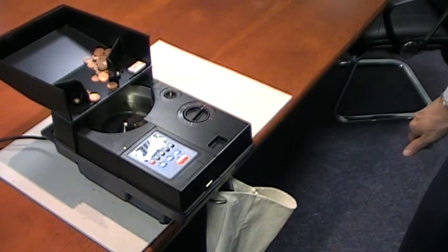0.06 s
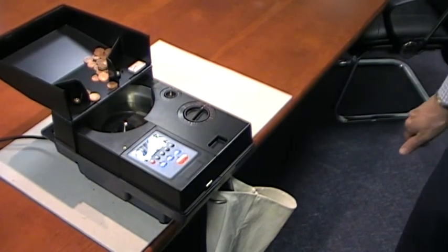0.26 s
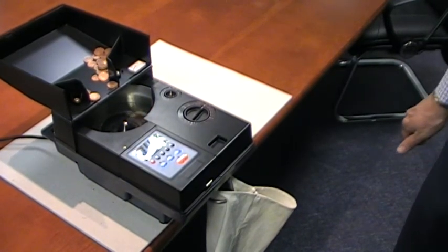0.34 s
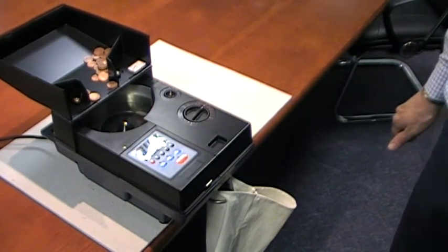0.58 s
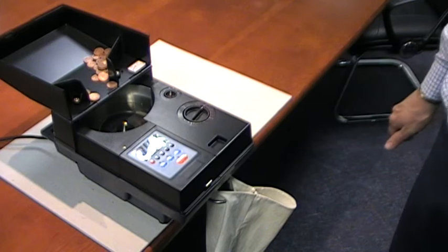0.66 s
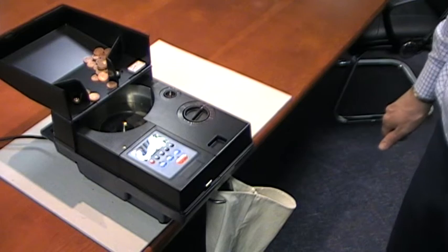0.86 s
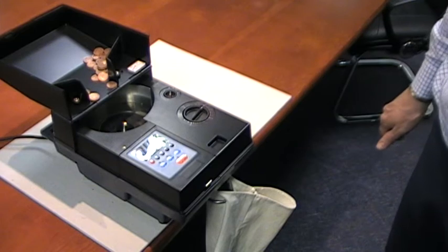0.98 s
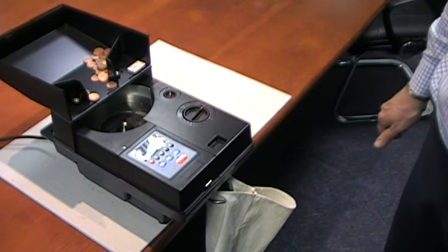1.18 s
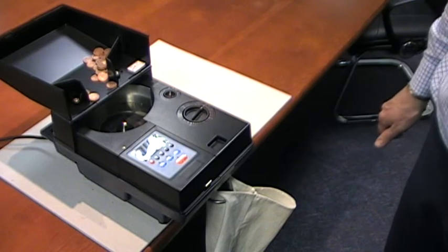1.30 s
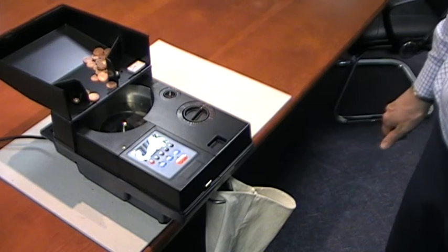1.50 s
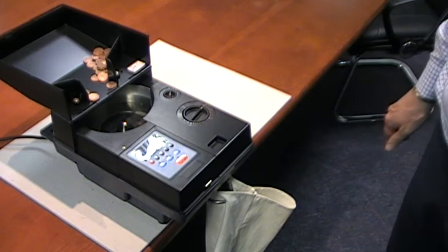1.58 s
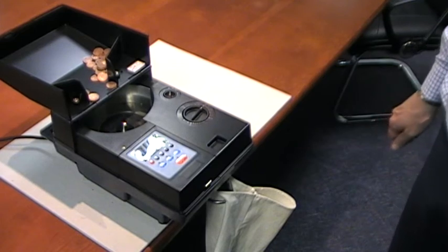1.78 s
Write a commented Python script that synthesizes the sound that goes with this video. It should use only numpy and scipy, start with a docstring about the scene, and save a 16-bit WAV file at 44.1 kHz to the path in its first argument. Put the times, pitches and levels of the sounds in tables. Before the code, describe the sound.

A tabletop coin counter starts with a scraping metallic jolt and squeak, rumbles briefly while three coins clack sharply, brakes with a ring and ticks once later; close stereo microphone in a quiet, faintly humming office.

```python
"""First a quiet office is heard: air noise, a faint hum and faint whines. Then a small coin counting machine on
a table runs one short burst. Its motor starts with a jolt, rumbles in the plastic housing and drags a steel
disc round; the struck steel chirps and the disc's edge squeaks. Three coins clack through the gate, the brake
rings the steel and a relay ticks late. Shaped noise makes the rush, rumble and scrape; fading sines make the
steel, coins and table."""
import sys
import numpy as np
from scipy import signal
from scipy.fft import rfft, irfft, next_fast_len
from scipy.io import wavfile
from scipy.ndimage import map_coordinates

SR = 44100
rng = np.random.default_rng(int(sys.argv[2]) if len(sys.argv) > 2 else 0)


def wav_record(signal):
    """Record a signal, one row per channel, as 16-bit PCM in the file named by sys.argv[1]."""
    frames = np.transpose(np.atleast_2d(signal))
    bounded = np.clip(frames, -1, 1)
    # unit amplitude maps onto the largest positive 16-bit level
    quanta = np.round(bounded * 32767).astype(np.int16)
    wavfile.write(sys.argv[1], SR, quanta)


def voltage_ratio(decibels):
    """Convert decibels (scalar or array-like) to amplitude ratios, 20 dB per decade."""
    exponent = np.asarray(decibels, float) / 20
    return 10 ** exponent


N = 81585  # length in samples

# A t60 is the time a sound takes to fade by 60 dB. Levels called relative are shifted or scaled later on.

# colour of the air noise: (frequency [Hz], relative level [dB])
AIR_COLOUR = [(15, -36.5), (25, -7), (65, -8), (191, -5), (231, -10), (347, -14), (467, -17), (535, -18),
              (702, -10.5), (872, -19), (1110, -11.5), (1210, -20), (4300, -30), (6050, -33.5),
              (8150, -34.5), (11500, -44), (15800, -50)]
AIR_DB, AIR_RISE_DB_PER_S = -60, 2
# how alike air and far rush are at left and right: (frequency [Hz], likeness [-1 to 1])
AIR_LIKENESS = [(60, -0.28), (240, -0.36), (950, -0.13), (3770, -0.2), (15000, -0.04)]
# swell of a far rush: (time [s], level [dB])
FAR_RUSH_SWELL = [(0, -68), (1.2, -60.5), (1.6, -55.5), (1.85, -52)]
# colour of the far rush: (frequency [Hz], relative level [dB])
FAR_RUSH_COLOUR = [(25, -18), (55, 4.5), (200, 0.5), (340, 0), (1100, -16.5), (6000, -30.5), (11000, -58.5)]
# hum lines: (frequency [Hz], level [dB], pitch waver [Hz])
HUM_LINES = [(58, -75, 4.3), (118.9, -67.5, 5.7), (460, -74, 10), (1084, -68, 3)]
# faint whines heard until just after the motor starts: (frequency [Hz], level [dB])
STANDBY_WHINES = [(3230, -81.5), (4560, -83)]

# how long the office rings: (frequency [Hz], t60 [s])
OFFICE_FADE = [(200, 1), (1000, 0.5), (4000, 0.13), (8000, 0.29), (14000, 0.067)]
# what the walls give back: (frequency [Hz], level [dB])
WALL_COLOUR = [(200, 0.5), (2000, 0.5), (7000, -4), (14000, -3)]
# width of the room sound: (frequency [Hz], side over mid [dB])
OFFICE_WIDTH = [(200, -6), (600, -16.5), (2500, -5), (6000, -3.5), (9000, -4), (14000, 3)]
OFFICE_DB = -10
# timing between the two microphone ports: (frequency [Hz], left ahead of right [rad])
LEFT_LEAD = [(60, 0), (260, .25), (1000, .2), (2000, -.1), (6000, .2), (7580, .3), (8440, 1.1), (9470, 1.3),
             (11400, .7), (13900, .6), (16000, -.3)]
# balance between the two ports: (frequency [Hz], left over right [dB])
LEFT_LEAN = [(60, -.5), (250, 2), (600, 2.4), (1400, 1), (2800, .7), (5600, -1.8), (10000, -.4),
             (15000, 1.2)]

# colour of the relay tick: (frequency [Hz], relative level [dB])
RELAY_COLOUR = [(410, -6.5), (700, 5.5), (1710, -12), (3990, -9), (4550, -14), (7290, -4.5), (9730, -4),
                (13700, -18.5), (16000, -40)]
RELAY_S, RELAY_DB, RELAY_RISE_S, RELAY_T60_S = 1.2285, -34, 0.00064, 0.029
RELAY_RATTLE_DB, RELAY_RATTLE_T60_S = -17, 0.3  # its loose cover buzzes on, level over the tick

# ringing tones of a coin: (frequency [Hz], relative level [dB], t60 [s])
COIN_MODES = [(2610, -12.5, 0.015), (3500, -9.5, .01), (4640, -3.5, 0.0096), (5400, -9, .008),
              (6530, 0.5, .035), (7100, 0, .03), (7800, -1, .025), (8780, 2, 0.025), (10350, -5, .015),
              (11260, -1, 0.0068), (12600, -14, .012), (14600, -24.5, .01)]
# coin contacts at the gate:
# (time [s], relative level [dB], brightness [dB per octave], time until gripped [s])
COIN_CLACKS = [(0.3924, -5.5, 3.5, .004), (0.393, -20, 1, .0032), (.3946, -14, -3, .002),
               (.5603, -15, -3, 0.0028), (.5608, -10, 10.5, .004), (0.562, -25.5, 2.5, .003),
               (0.565, -18, 2, .001), (.7018, -18, -0.5, .0047), (.7027, -13, 2.5, .0038),
               (0.7039, -19, 4.5, .0022)]
CONTACT_S, GRIP_S, GRIP_LEAVES_DB = 0.00025, 0.0006, -16.5
CLICK_DB, STEEL_ANSWER_DB = 8, -18  # both over the coin's own ring

# chirps of the struck steel (first two rows) and squeaks of the disc's rubbed edge (the rest): (centre time
# [s], level [dB], length [s], frequency [Hz])
CHIRPS_AND_SQUEAKS = [(0.2613, -13, 0.00787, 7700), (0.2665, -16.5, .008, 7060), (0.275, -22, .008, 7700),
                      (0.37, -26, 0.014, 7100), (0.425, -35, 0.018, 7100), (0.516, -26.5, 0.016, 7060),
                      (0.658, -33, 0.016, 7100), (0.691, -30, 0.016, 7100), (0.81, -35.5, 0.016, 7100)]
SQUEAK_WAVER_HZ = 40

# ringing tones of the steel disc and frame: (frequency [Hz], relative level [dB], t60 [s])
STEEL_MODES = [(1914, -22.5, 0.32), (2430, -20, 0.22), (2530, -18, .25), (3582, -11.5, 0.37),
               (4236, -19.5, .25), (4800, -17, .25), (5143, -8.5, 0.42), (6019, -11, 0.441),
               (6370, -15.5, 0.4), (6910, -11.5, .32), (7150, -1, 0.23), (7030, -3.5, 0.3),
               (7429, -12.5, .3), (7634, -5, 0.29), (7810, -6, 0.33), (8300, -9, .2), (9330, -7, 0.22),
               (9544, -5.5, 0.29), (11270, -15.5, 0.11), (11900, -16.5, 0.18), (13900, -28, .25)]
# ringing tones of the table and casing: (frequency [Hz], relative level [dB], t60 [s])
TABLE_MODES = [(84.5, -18, .4), (258, -12.5, 0.14), (334.7, 0.5, 0.34), (450, -10.5, 0.29),
               (570, -12.5, 0.32), (680, -12.5, .4), (810.5, 7.5, 0.18), (1078, 1.5, 0.17),
               (1369, -15.5, 0.13)]
# relative spacing of the close partners in each ringing tone
SPLIT, TABLE_SPLIT = 0.0022, 0.014
# blows on the steel: (time [s], relative ring level [dB], relative crack level [dB],
# relative knock level in housing and table [dB], crack brightness [dB per octave])
STEEL_BLOWS = [(.2043, -50, -35, -29, 3), (.231, -36.5, -20, -29.5, -2.5),
               (0.2393, -26.5, -17.5, -17.5, -1), (0.2481, -35, -23.5, -32.5, 0.2),
               (0.2597, -27, -11, -36.5, 9), (.276, -39.5, -18.5, -29, -3.5), (.2855, -36, -16, -25, -3),
               (0.8735, -28.5, -15.5, -28.5, 1)]
# colour of the crack: (frequency [Hz], relative level [dB])
CRACK_COLOUR = [(290, -39.5), (500, -8), (2390, -9), (3150, -15.5), (3590, -5.5), (4600, -19.5),
                (7310, -2.5), (13800, -31), (16000, -81)]
# rises are time constants
BLOW_RISE_S, CRACK_RISE_S, CRACK_T60_S = 0.00049, 0.0015, 0.023
WASH_DB, WASH_T60_S = -1.5, 0.46  # loose parts rattle on while the steel rings, level over the ring
TABLE_DB, TABLE_RISE_S = -18, 0.0033
# single casing parts left ringing by a jolt: (time [s], frequency [Hz], relative level [dB], t60 [s])
CASING_SHUDDERS = [(.23, 324.5, -19, 0.1), (.252, 2420, -24, .08), (.284, 2400, -22, .05),
                   (.31, 340, -33.5, 0.1), (.874, 782, -35.5, 0.081), (.874, 690, -42, 0.5),
                   (.874, 2340, -32, 0.083), (.874, 3540, -21.5, 0.054), (1.232, 338, -45, 0.25),
                   (1.236, 576, -46.5, 0.46), (1.231, 1594, -55, .2), (1.232, 3630, -63, 0.3),
                   (1.233, 3850, -68, 0.34)]
SHUDDER_RISE_S, SHUDDER_SPLIT_HZ = 0.004, 17

# motor effort: (time [s], relative rumble level [dB], relative scrape level [dB])
MOTOR_EFFORT = [(0.186, -60.5, -80.5), (0.192, -43, -76.5), (0.206, -28, -51), (0.216, -30, -55),
                (0.24, -23, -30.5), (0.262, -38, -26.5), (0.27, -40.5, -40), (0.284, -30, -27),
                (0.304, -28, -50.5), (0.378, -32.5, -40), (0.392, -30, -41), (0.402, -44, -45),
                (0.462, -35.5, -45.5), (0.572, -30, -41.5), (0.59, -34.5, -42), (0.694, -35, -45),
                (0.724, -29.5, -45.5), (0.863, -49, -59.5)]
# colour of the broad rumble: (frequency [Hz], relative level [dB])
RUMBLE_COLOUR = [(71, -53), (120, -14.5), (301, -19.5), (412, -13), (580, -8), (1150, -1.5), (1790, -9),
                 (1990, -8), (5000, -20), (6500, -47.5), (11000, -120)]
# resonances of the plastic housing: (frequency [Hz], width [Hz], gain [dB])
HOUSING_PEAKS = [(201.6, 25, -9), (314, 45, 2), (597, 70, 1), (686, 39, 2.5), (815, 44, -0.5),
                 (1268, 18, -6.5), (1890, 45, -24), (2420, 160, -9)]
BROAD_DB, TEETH_PER_S, TOOTH_SPREAD_DB = -8, 3000, 1.5
# colour of the scrape: (frequency [Hz], relative level [dB])
SCRAPE_COLOUR = [(880, -39), (1500, -7), (1760, -10), (3350, -9), (4460, -9), (5440, -11), (7240, -5.5),
                 (12100, -30.5), (16000, -51.5)]
RUB_RING_DB, SCRAPE_DB = 3.5, 4
GRIT_PER_S, GRIT_SPREAD_DB = 14000, 1
WHINE_HZ, WHINE_DB, WHINE_FROM_S, WHINE_TO_S = 475.4, -45.5, 0.34, 0.793

LOW_CUT_HZ, TOP_HZ, CEILING = 42, 16400, 1.05


def unit(x):
    """Bring to an average strength (rms) of 1."""
    return x / np.sqrt(np.mean(x ** 2) + 1e-20)


def along(points, hz):
    """Read a curve of (frequency, value) points on a log frequency axis."""
    f, v = np.transpose(points)
    return np.interp(np.log(hz + 1), np.log(f + 1), v)


def wobble(rate):
    """A smooth random curve through so many random knots a second."""
    knots = rng.standard_normal(int(N * rate / SR) + 4)
    return map_coordinates(knots, [np.arange(N) * rate / SR])


def filtered(x, response):
    """Multiply the spectrum of x by a response that depends on frequency."""
    m = next_fast_len(N + SR)  # spare room lets the ringing die out
    return irfft(rfft(x, m) * response(np.fft.rfftfreq(m, 1 / SR)), m)[..., :N]


def resonances(peaks):
    """Response of a body that rings at (frequency, width, gain) peaks after it is struck."""
    def response(f):
        total = 0
        for k, (centre, width, db) in enumerate(peaks):
            peak = 1j * f * width / (centre * centre - f * f + 1j * f * width)
            total = total + (-1) ** k * voltage_ratio(db) * peak  # neighbours have opposite signs
        return total
    return response


def grains(per_s, spread_db):
    """Tiny impacts of uneven size at random moments, over a little steady noise."""
    hits = rng.random(N) < per_s / SR
    sizes = rng.standard_normal(N) * voltage_ratio(spread_db * rng.standard_normal(N))
    return unit(hits * sizes + 0.02 * rng.standard_normal(N))


def ring(modes, t, scatter_db, split, count=4, phase_spread=1):
    """Fading tones, each a cluster of close partials with random levels and phases."""
    hz, db, t60 = np.repeat(np.transpose(modes), count, axis=1)[:, :, None]
    level, detune, phase = rng.standard_normal((len(hz), 3)).T[:, :, None]
    place = np.tile(np.arange(count) - (count - 1) / 2, len(modes))[:, None]
    detune = place + detune / 4
    db = db - 2 * np.abs(place)  # the middle partials lead
    fade = voltage_ratio(db + scatter_db * level - 60 * t / t60)
    partials = fade * np.sin(2 * np.pi * (hz * (1 + split * detune) * t + phase_spread * phase))
    return partials.sum(axis=0) / np.sqrt(count)


def add(track, s, x):
    """Mix x into track from time s."""
    part = track[round(s * SR):][:len(x)]
    part += x[:len(part)]


def rise(t, time_constant):
    """A quick, smooth start from silence."""
    return 1 - np.exp(-t / time_constant)


def tone(hz, waver_hz):
    """A sine of rms 1 whose pitch wavers."""
    return np.sqrt(2) * np.sin(2 * np.pi * np.cumsum(hz + waver_hz * wobble(40)) / SR)


def background():
    """Noise shaped into air and a far rush, with wavering sines for hum lines and standby whines."""
    t = np.arange(N) / SR

    def wide_noise(colour):
        def mid_and_side(hz):
            turn = np.arccos(np.clip(along(AIR_LIKENESS, hz), -1, 1)) / 2
            return voltage_ratio(along(colour, hz)) * [np.cos(turn), np.sin(turn)]
        mid, side = filtered(rng.standard_normal((2, N)), mid_and_side)
        return unit(np.array([mid + side, mid - side]))

    s, db = np.transpose(FAR_RUSH_SWELL)
    far_rush = voltage_ratio(np.interp(t, s, db) + 1.8 * wobble(3.5)) * wide_noise(FAR_RUSH_COLOUR)
    hum = sum(voltage_ratio(db + 1.5 * wobble(49)) * tone(hz, waver_hz) for hz, db, waver_hz in HUM_LINES)
    standby = (t < MOTOR_EFFORT[2][0]) * sum(voltage_ratio(db) * tone(hz, 3) for hz, db in STANDBY_WHINES)
    air = voltage_ratio(AIR_DB + AIR_RISE_DB_PER_S * t) * wide_noise(AIR_COLOUR)
    return standby + air + far_rush + hum


def office(x):
    """Two unrelated room answers made of fading noise: each frequency dies at its own speed."""
    out, hop = np.zeros((2, N + 2 * SR)), SR // 6
    for start in range(0, N, hop):  # every sixth of a second gets a new tail
        hz, t, z = signal.stft(rng.standard_normal((2, SR // 2)), SR, nperseg=256)
        fade = voltage_ratio(-60 * t / along(OFFICE_FADE, hz)[:, None])
        tail = signal.istft(z * fade, SR, nperseg=256)[1]
        tail = tail / np.linalg.norm(tail[0])
        wet = signal.fftconvolve(x[None, start:start + hop], tail, axes=1)
        out[:, start + SR // 300:][:, :wet.shape[1]] += wet  # the answer comes 1/300 s late
    return out[:, :N]


def relay():
    """A contact snaps: one short burst of coloured noise, then a faint rattle that fades slowly."""
    t = np.clip(np.arange(N) / SR - RELAY_S, 0, None)
    noise = unit(filtered(rng.standard_normal(N), lambda hz: voltage_ratio(along(RELAY_COLOUR, hz))))
    tick = voltage_ratio(-60 * t / RELAY_T60_S)
    rattle = voltage_ratio(RELAY_RATTLE_DB - 60 * t / RELAY_RATTLE_T60_S)
    return voltage_ratio(RELAY_DB) * (tick + rattle) * rise(t, RELAY_RISE_S) * noise


def coins():
    """A coin clicks, rings freely for a few ms, is gripped by the belt; the steel answers faintly."""
    out, t = np.zeros(N), np.arange(SR // 3) / SR
    contact = np.sin(np.pi / 2 * np.clip(t / CONTACT_S, 0, 1)) ** 2
    click = voltage_ratio(CLICK_DB) * np.exp(-t / 0.0003)
    for s, db, bright_db, free_s in COIN_CLACKS:
        modes = [(hz, level + bright_db * np.log2(hz / 7000), t60) for hz, level, t60 in COIN_MODES]
        grip = voltage_ratio(GRIP_LEAVES_DB * np.clip((t - free_s) / GRIP_S, 0, 1))
        coin_ring = ring(modes, t, 0.97, SPLIT, count=1, phase_spread=0.27)
        coin = contact * (1 + click) * grip * coin_ring
        answer = voltage_ratio(STEEL_ANSWER_DB) * ring(STEEL_MODES, t, 3.5, SPLIT, count=2)
        add(out, s, voltage_ratio(db - 8.5) * (coin + answer))
    return out


def chirps_and_squeaks():
    """Struck steel chirps and the rubbed edge of the disc sings, each in short swells of a wavering sine."""
    t = np.arange(N) / SR
    drift = np.cumsum(SQUEAK_WAVER_HZ * wobble(60)) / SR
    out = np.zeros(N)
    for s, db, length, hz in CHIRPS_AND_SQUEAKS:
        swell = voltage_ratio(db) * np.exp(-8 * ((t - s) / length) ** 2)
        out += swell * np.sqrt(2) * np.sin(2 * np.pi * (hz * t + drift))
    return out


def blows():
    """Each blow swells for a moment, rings the steel, cracks and knocks housing and table."""
    out, knocks, t = np.zeros(N), np.zeros(N), np.arange(SR // 2) / SR
    hz = np.fft.rfftfreq(len(t), 1 / SR)
    for s, ring_db, crack_db, knock_db, bright_db in STEEL_BLOWS:
        colour = voltage_ratio(6 + along(CRACK_COLOUR, hz) + bright_db * np.log2((hz + 1) / 5000))
        noise = irfft(rfft(rng.standard_normal(len(t))) * colour, len(t))
        steel = voltage_ratio(ring_db) * rise(t, BLOW_RISE_S) * ring(STEEL_MODES, t, 0.97, SPLIT, count=3)
        crack = voltage_ratio(crack_db - 60 * t / CRACK_T60_S)
        wash = voltage_ratio(ring_db + WASH_DB - 60 * t / WASH_T60_S)
        noisy = (crack + wash) * rise(t, CRACK_RISE_S) * noise
        table = voltage_ratio(knock_db + TABLE_DB) * rise(t, TABLE_RISE_S) * ring(TABLE_MODES, t, 2.4, TABLE_SPLIT)
        add(out, s, steel + noisy + table)
        add(knocks, s, voltage_ratio(knock_db + 19) * np.hanning(9))
    return out + filtered(knocks, resonances(HOUSING_PEAKS))


def shudders():
    """Casing parts left ringing by a jolt: clusters of close tones that swell briefly, then fade."""
    out, t = np.zeros(N), np.arange(SR // 2) / SR
    for s, *mode in CASING_SHUDDERS:
        cluster = ring([mode], t, 1.8, SHUDDER_SPLIT_HZ / mode[0], count=5, phase_spread=0.4)
        add(out, s, rise(t, SHUDDER_RISE_S) * cluster)
    return out


def motor():
    """Gear teeth shake the housing, grit under the disc rings the steel, the armature whines at full speed."""
    t = np.arange(N) / SR
    s, rumble_db, scrape_db = np.transpose(MOTOR_EFFORT)
    # quick fade-in at the first point, a fall of 150 dB per second after the last
    on = np.clip((t - s[0]) / 0.006, 0, 1) * voltage_ratio(-150 * np.clip(t - s[-1], 0, None))

    body = resonances(HOUSING_PEAKS)
    teeth = grains(TEETH_PER_S, TOOTH_SPREAD_DB)
    rumble = unit(filtered(teeth, lambda f: body(f) + voltage_ratio(BROAD_DB + along(RUMBLE_COLOUR, f))))
    rumble = on * voltage_ratio(np.interp(t, s, rumble_db) - 4.5 + 0.5 * wobble(30)) * rumble

    grit_level = voltage_ratio(SCRAPE_DB + np.interp(t, s, scrape_db) + 1.6 * wobble(35))
    grit = grains(GRIT_PER_S, GRIT_SPREAD_DB) * on * grit_level
    hiss_rms = np.sqrt(np.mean(voltage_ratio(2 * along(SCRAPE_COLOUR, np.linspace(0, SR / 2, 4096)))))
    # a fade time t60 is the same as a resonance width of ln(1000) / (pi t60)
    steel = resonances([(hz, np.log(1000) / np.pi / t60, db + 23.5) for hz, db, t60 in STEEL_MODES])
    scrape = filtered(grit, lambda f: voltage_ratio(along(SCRAPE_COLOUR, f)) / hiss_rms + voltage_ratio(RUB_RING_DB) * steel(f))

    fade_in = np.clip((t - WHINE_FROM_S) / 0.0303, 0, 1)
    fade_out = np.clip((WHINE_TO_S - t) / 0.051, 0, 1)
    whine = voltage_ratio(WHINE_DB + 0.89 * wobble(12)) * fade_in * fade_out * tone(WHINE_HZ, 1.5)
    return rumble + scrape + whine


def scene():
    """Machine and most of the room reach two close microphone ports at slightly different phase and level."""
    machine = motor() + blows() + shudders() + chirps_and_squeaks() + coins() + relay()
    to_walls = filtered(machine, lambda hz: voltage_ratio(along(WALL_COLOUR, hz)))
    mid, side = voltage_ratio(OFFICE_DB) * office(to_walls)
    side = filtered(side, lambda hz: voltage_ratio(along(OFFICE_WIDTH, hz)))

    def ports(hz):
        left = voltage_ratio(along(LEFT_LEAN, hz) / 2) * np.exp(0.5j * along(LEFT_LEAD, hz))
        return np.array([left, 1 / left])

    near = filtered(machine + mid, ports)
    return near + np.array([side, -side]) + background()


def band_limit(x):
    """A steep low-pass at the top of the band."""
    return signal.sosfilt(signal.butter(12, 16460, fs=SR, output="sos"), x)


def record(dry):
    """The microphone drops the deepest bass, the input rounds off the highest peaks, the top is cut off."""
    x = filtered(dry, lambda hz: hz ** 2 / (hz ** 2 + LOW_CUT_HZ ** 2))
    x = x / (1 + np.abs(x / CEILING) ** 4) ** (1 / 4)
    x = filtered(x, lambda hz: hz < TOP_HZ)
    return band_limit(x)


dry = scene()
out = record(dry)
wav_record(out)
```